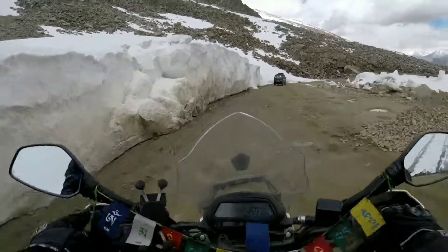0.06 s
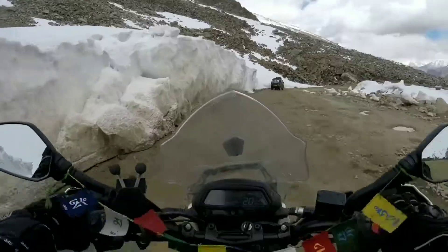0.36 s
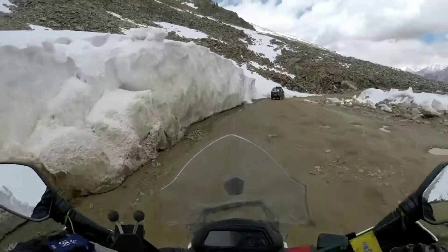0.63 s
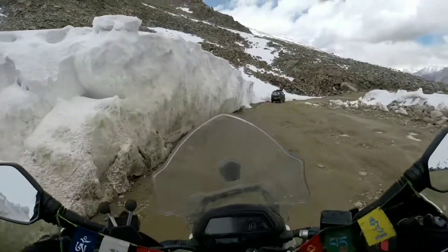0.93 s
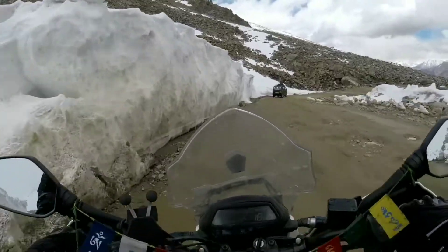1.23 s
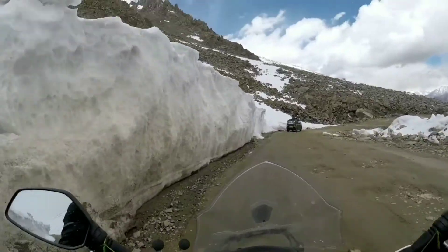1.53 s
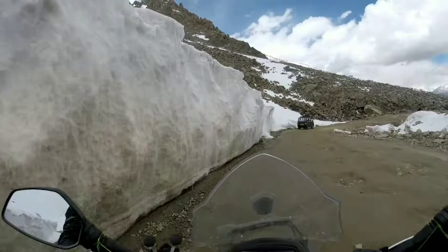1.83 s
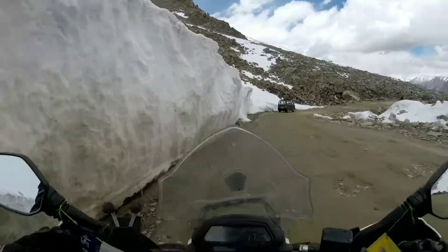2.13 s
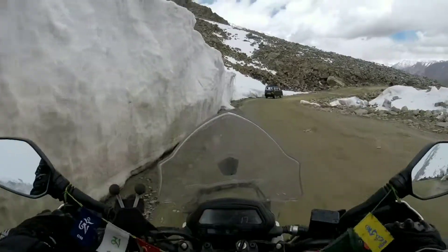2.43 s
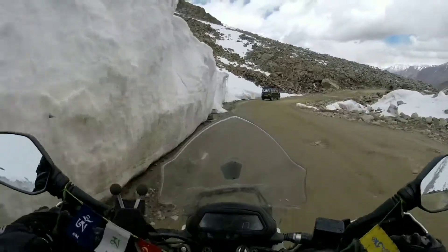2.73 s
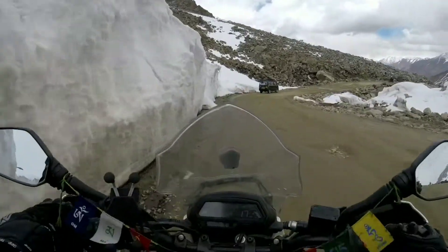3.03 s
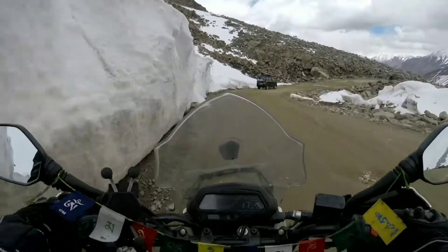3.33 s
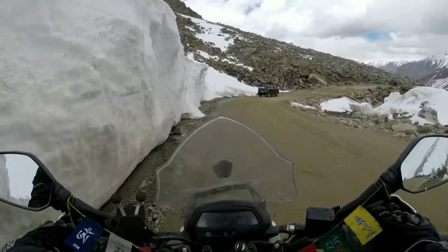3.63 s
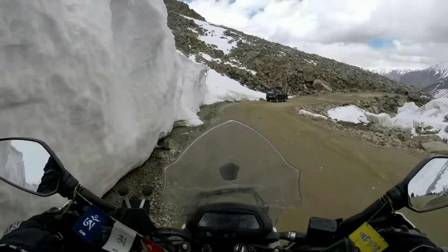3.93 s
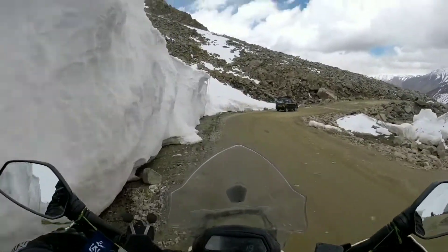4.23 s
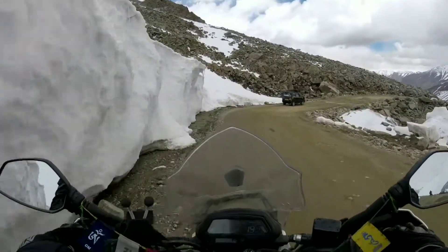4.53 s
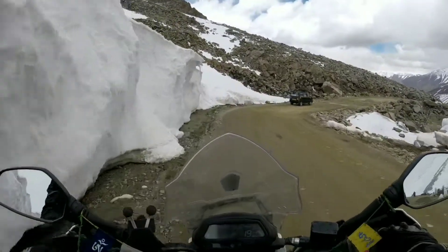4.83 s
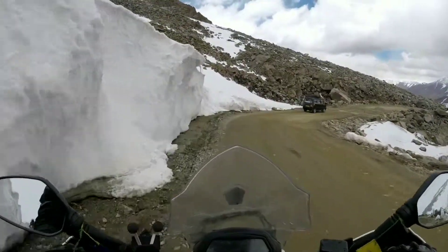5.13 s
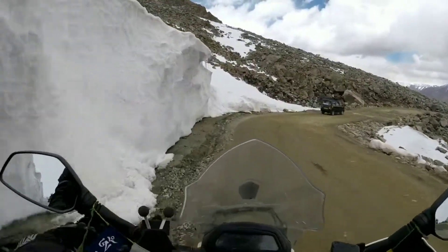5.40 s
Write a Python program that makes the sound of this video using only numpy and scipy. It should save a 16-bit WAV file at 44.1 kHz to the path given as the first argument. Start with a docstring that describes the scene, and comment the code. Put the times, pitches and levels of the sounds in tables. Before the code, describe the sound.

Heard from the seat, a motorcycle engine rumbles at low revs and briefly pulls, while tyres crunch and gravel clicks sharply.

```python
"""A single-cylinder motorcycle engine, heard from the seat, rolling slowly on wet gravel.
Each firing swings the gas in intake and exhaust: a thump at fast idle, a one-second pull with
gear whine, then a drop as the throttle shuts. Valve gear rings the cases; a body panel drones.
Tyres crunch through rough patches, stones tick against the bike, air buffets the microphone."""
import sys
import numpy as np
from scipy import signal
from scipy.fft import rfft, irfft, next_fast_len
from scipy.io import wavfile
from scipy.ndimage import uniform_filter1d, minimum_filter1d

SR = 44100
rng = np.random.default_rng(int(sys.argv[2]) if len(sys.argv) > 2 else 0)


def put_to_file(sound):
    """Save the sound as 16-bit audio at rate SR, in the file named by the first command-line argument."""
    columns = np.atleast_2d(sound).T  # one column per channel
    safe = np.clip(columns, -1, 1)
    whole_steps = np.round(safe * 32767)
    wavfile.write(sys.argv[1], SR, whole_steps.astype(np.int16))


N = 245195
TIME_S = np.arange(N) / SR

# Engine speed. Each row: time in seconds, firing rate in Hz.
FIRING_RATE = [(0.0, 19.69), (0.4, 19.74), (0.57, 18.81), (0.74, 20.02), (1.09, 18.24), (1.75, 19.41),
               (1.98, 18.94), (2.3, 18.96), (2.5, 19.88), (2.66, 21.37), (3.12, 23.62), (3.64, 25.0),
               (3.77, 23.9), (4.01, 20.84), (4.29, 18.63), (5.07, 19.71), (5.4, 17.42), (5.56, 18.35)]
# Exhaust bark. Each row: time in seconds, level in dB.
EXHAUST_LEVEL = [(0, -5), (2.2, -4.5), (3.4, -9.5), (4.5, -10), (5.3, -4.4)]
# Pipe response to higher firing orders. Each row: frequency in Hz, relative level in dB.
PIPE_RESPONSE = [(140, 6), (170, 1.5), (205, -7.5), (250, 0.5), (280, 0.5), (315, -22), (370, -7),
                 (420, -12.5), (560, -18)]
# Engine case resonances. Each row: frequency in Hz, relative level in dB, T60 in seconds.
CASE_MODES = [(187, -2.5, 0.038), (248, 0, 0.11), (275, -5.5, 0.074), (352.7, -8.5, 0.23),
              (374, -1.5, 0.11), (542.4, -7, 0.077), (1190, -27, 0.011), (1506, -9, 0.034),
              (2183, -13, 0.02)]
# Rough road. Each row: centre in seconds, half length in seconds, crunch in dB, jolt in dB.
ROUGH_PATCHES = [(0.405, 0.053, -22.5, -8), (0.656, 0.054, -25.5, -10), (0.928, 0.11, -26.5, -12.5),
                 (1.19, 0.051, -29, -19.5), (1.566, 0.021, -25, -19.5), (1.928, 0.041, -23, -15),
                 (3.576, 0.13, -42, -15), (4.286, 0.067, -46, -16), (4.57, .07, -37, -14),
                 (5.11, 0.052, -44, -16.5)]
# Stone hits. Each row: time in seconds, level in dB, stone's ring in Hz, ring re fitting in dB.
STONE_HITS = [(0.062, -5.5, 5320, -2), (0.3212, -6.5, 5660, 15), (0.389, -21, 5600, 2),
              (0.4232, -15, 5160, 25), (.618, -16.5, 5970, 8), (.7598, -8.5, 5400, 1),
              (0.786, -10, 10640, -9), (1.0097, -9, 5440, -6), (1.1136, -11.5, 8300, -10),
              (1.5187, -12.5, 9700, -3), (1.529, -9, 5300, -2), (1.5387, -10.5, 8600, -3),
              (1.703, -7, 5300, -8), (1.7244, -21.5, 10700, 9), (1.8105, -5, 8070, 0),
              (1.8242, -11, 5480, 3), (1.8525, -9.5, 7700, 5), (1.9318, -12, 5700, -2),
              (1.9476, -13.5, 7900, 13), (2.0414, -13.5, 7700, 0), (2.056, -7, 5600, 3),
              (2.074, -17, 5770, -11), (2.3173, -9.5, 5700, 0), (2.3313, -23, 8140, 6),
              (2.5, -12.5, 5670, 8), (2.909, -9, 5700, -3), (3.666, -16, 6100, -2.5),
              (4.531, -19.5, 5300, 1)]
# Resonances of a struck fitting. Each row: frequency in Hz, relative gain in dB, T60 in seconds.
FITTING_MODES = [(3090, 6, 0.015), (3786, 11.5, 0.0037), (5530, 3.5, 0.029), (6200, -6, 0.0036),
                 (8050, -2.5, 0.063), (9640, -19, 0.086), (15100, 13, 0.0064)]
# Front-end knocks. Each row: start in seconds, level in dB.
BUMPS = [(.355, -17), (0.386, -17), (.423, -13.5), (0.621, -22), (.655, -15), (.866, -20), (0.943, -13.5),
         (3.609, -17), (4.559, -13)]
# Faint squeaks. Each row: centre in seconds, peak in dB, pitch in Hz.
RUB_SQUEAKS = [(5.145, -30, 2320), (5.39, -32, 2200)]
# Noise spectra of tyres, hiss, knocks and wind. Each row: frequency in Hz, relative level in dB.
TYRE_SPECTRUM = [(120, 13), (250, 6.5), (420, 9.5), (560, 4.5), (750, 2), (1150, 3.5), (1600, -2),
                 (1900, -3), (2400, -9.5), (3400, -11), (4300, -19.5), (7000, -10.5), (12000, -91)]
HISS_SPECTRUM = [(1500, -8), (2300, -3), (3400, -6), (4400, -15), (4900, -7), (5500, 2), (6400, -4),
                 (7400, -4), (8800, -10), (10300, -11), (11300, -26.5), (13500, -25), (15500, -33)]
KNOCK_SPECTRUM = [(200, 16.5), (400, 18.5), (700, -3), (1200, 15), (1700, -2), (2500, 0), (3500, -9.5),
                  (5000, -40), (9000, -45)]
WIND_SPECTRUM = [(12, -12), (25, -4), (45, 0), (75, -5), (130, -11), (200, -18), (400, -36), (4000, -100)]


def thump(cycle):
    """Each firing: intake gulp, exhaust bark, silencer boom; airbox honk and slow puff grow with revs."""
    intake_db = rev_level_db(-3.5, db_per_hz=-0.28) - 10 * throttle_shut()
    honk_db = intake_db + rev_level_db(-25, db_per_hz=3)
    boom_db = rev_level_db(-13.5, db_per_hz=0.5)
    intake = from_db(intake_db) * gas_surge(cycle, angle=0.047, width=0.107, swings=5.635)
    exhaust = from_db(curve(EXHAUST_LEVEL)) * gas_surge(cycle, angle=0.246, width=0.189, swings=4.6)
    boom = from_db(boom_db) * gas_surge(cycle, 0.25, width=0.34, swings=1.85, uneven_db=0.8, jitter=0.011)
    honk = from_db(honk_db) * gas_surge(cycle, angle=-0.145, width=0.1, swings=5.6, uneven_db=0.8)
    puff = from_db(rev_level_db(-20, db_per_hz=2)) * np.cos(2 * np.pi * (cycle - 0.36))
    return intake + exhaust + boom + honk + puff


def gas_surge(cycle, angle, width, swings, uneven_db=1.0, jitter=0.006):
    """The gas column swings in one uneven burst per firing. Angle, width, jitter in cycles."""
    strength, early = rng.standard_normal((int(cycle[-1]) + 8, 2)).T
    out = 0
    for neighbour in (-1, 0, 1):
        firing = np.round(cycle - angle).astype(int) + neighbour
        offset = cycle - angle - firing + jitter * early[firing]
        envelope = from_db(uneven_db * strength[firing]) * np.exp(-0.5 * (offset / width) ** 2)
        out += envelope * np.sin(2 * np.pi * swings * offset)
    return out


def pipe_overtones(cycle, waver_db=6.0):
    """Each firing's sharp edge adds higher orders, shaped by the pipe, louder with revs."""
    rate_hz, out = curve(FIRING_RATE), 0
    hz, db = np.transpose(PIPE_RESPONSE)
    for order in range(7, 25):
        gain = from_db(np.interp(order * rate_hz, hz, db) + waver_db * drift(4.3))
        out += gain * np.sin(2 * np.pi * (order * cycle + rng.random()) + 0.5 * drift(2.46))
    return from_db(rev_level_db(-27.5, db_per_hz=1.0)) * unit_rms(out)


def case_clatter(cycle, jolt, per_cycle=9):
    """Piston, valves and cam chain ring the cases at set crank angles; louder on jolts."""
    angles = (np.arange(per_cycle) + rng.random(per_cycle)) / per_cycle
    hits = (np.arange(-1, int(cycle[-1]) + 1)[:, None] + angles).ravel()
    at = np.searchsorted(cycle, hits[(hits > cycle[0]) & (hits < cycle[-1])])
    out = 0
    for hz, level_db, t60_s in CASE_MODES:
        signs = np.resize(rng.choice([-1, 1], per_cycle), len(at))
        clicks = np.zeros(N)
        clicks[at] = signs + 0.7 * rng.standard_normal(len(at))
        out += from_db(level_db) * unit_rms(ring(clicks, hz, t60_s))
    steady = from_db(rev_level_db(-26.5, db_per_hz=-0.51, db_per_s=-0.14))
    return np.hypot(steady, from_db(-14) * jolt) * unit_rms(out)


def panel_drone(cycle, jolt, hz=274.4, t60_s=0.14):
    """A body panel drones when a firing order sweeps through its note, and when jolted."""
    firings = np.diff(np.floor(cycle), prepend=np.floor(cycle[0]))
    firings *= 1 + 0.4 * rng.standard_normal(N)
    level_db = rev_level_db(-37.5, db_per_hz=1.17) + 7.5 * throttle_shut(linger_s=0.51)
    driven = from_db(level_db) * unit_rms(ring(firings, hz, t60_s))
    jolted = from_db(-17.5) * jolt * unit_rms(ring(rng.standard_normal(N), hz, t60_s))
    return driven + jolted


def gear_whine(cycle):
    """The gearbox sings at high revs, with two overtones; the drive chain whirs throughout."""
    phase, flutter = tooth_mesh(cycle, order=60, twist_rad=1.2, rough_rad=2.2)
    tone = np.sin(phase) + from_db(-11.5) * np.sin(2 * phase) + from_db(-10.5) * np.sin(4 * phase)
    gearbox = flutter * tone * housing_gain(60, base_db=-46, boost_db=17, centre_hz=1450, width_hz=190)
    phase, flutter = tooth_mesh(cycle, order=80, twist_rad=1.8, rough_rad=3.6)
    chain_gain = housing_gain(80, base_db=-37.5, boost_db=4, centre_hz=1670, width_hz=90)
    return gearbox + chain_gain * flutter * np.sin(phase)


def tooth_mesh(cycle, order, twist_rad, rough_rad):
    """Phase and flutter of meshing teeth; each firing twists the shafts and smears the tone."""
    phase = 2 * np.pi * order * cycle + twist_rad * np.sin(2 * np.pi * cycle) + rough_rad * drift(11.2)
    return phase, unit_rms(1 + 0.5 * drift(110))


def housing_gain(order, base_db, boost_db, centre_hz, width_hz):
    """A mesh tone swells as it crosses a housing resonance."""
    detune = (order * curve(FIRING_RATE) - centre_hz) / width_hz
    return from_db(base_db + boost_db * np.exp(-detune ** 2))


def hiss(cycle, patch_gain, spray_db=-12):
    """Valve gear and wet grit sizzle, pulsing with each crank turn; rough patches throw spray."""
    sizzle = 0.99 * grains(per_s=900, spread_db=1.0) + rng.standard_normal(N)
    pulse_db = np.sin(4 * np.pi * cycle)
    steady = from_db(rev_level_db(-38, db_per_hz=0.52, db_per_s=-0.35) + pulse_db)
    return np.hypot(steady, from_db(spray_db) * patch_gain) * coloured(sizzle, HISS_SPECTRUM)


def tyres(patch_gain, flicker_db=2.0):
    """Tread crushes grit over a rolling rush; louder on rough patches."""
    crunch = grains(per_s=1300, spread_db=3.0) + 0.79 * rng.standard_normal(N)
    rolling = from_db(rev_level_db(-27.5, db_per_hz=0.36, db_per_s=-0.18))
    flicker = from_db(flicker_db * drift(32))
    return np.hypot(rolling, patch_gain) * flicker * coloured(crunch, TYRE_SPECTRUM)


def rough_patches():
    """Crunch and jolt gains swell and fade as the wheels cross each patch."""
    crunch = jolt = 0
    for centre_s, half_s, crunch_db, jolt_db in ROUGH_PATCHES:
        swell = np.exp(-np.minimum(((TIME_S - centre_s) / half_s) ** 2, 20))
        crunch += from_db(crunch_db) * swell
        jolt += from_db(jolt_db) * swell
    return crunch, jolt


def stone_ticks(lead_in_s=0.0045, lead_in_db=-17, attack_s=0.00018, contact_s=0.0034):
    """Stones strike a fitting and both ring. A faint, brief hiss leads into each dry crack."""
    out, t = np.zeros(N + SR), TIME_S[:SR // 25]
    crack_band = signal.butter(2, [2400, 9800], "band", fs=SR, output="sos")
    since_s = np.maximum(t - lead_in_s, 0)
    rise = from_db(lead_in_db) + 1 - np.exp(-since_s / attack_s)
    envelope = rise * np.exp(-(since_s / contact_s) ** 2)
    for hit_s, level_db, stone_hz, stone_db in STONE_HITS + loose_grit():
        burst = rng.standard_normal(len(t)) * envelope
        fitting = 0
        for hz, db, t60_s in FITTING_MODES:
            gain = from_db(db + 2 * rng.standard_normal())
            fitting += gain * ring(burst, hz * (1 + 0.028 * rng.standard_normal()), t60_s)
        stone = from_db(stone_db) * unit_rms(ring(burst, stone_hz, t60_s=0.016))
        crack = from_db(0.5) * unit_rms(signal.sosfilt(crack_band, burst))
        tick = unit_rms(fitting) + stone + crack
        start = round((hit_s - lead_in_s) * SR)
        out[start:start + len(t)] += from_db(level_db) * tick / np.abs(tick).max()
    return signal.sosfilt(signal.butter(4, 10800, fs=SR, output="sos"), out[:N])


def loose_grit(count=11, from_s=0.27, to_s=1.05, level_db=-17.5, low_hz=5050, high_hz=6980, ring_db=8.5):
    """Small stones fly at random off loose road; rows as in STONE_HITS."""
    return [(from_s + when * (to_s - from_s), level_db, low_hz + pitch * (high_hz - low_hz), ring_db)
            for when, pitch in rng.random((count, 2))]


def front_knocks(decay_s=0.0093):
    """The front end knocks dully over larger bumps."""
    envelope = np.zeros(N)
    for start_s, level_db in BUMPS:
        start = round(start_s * SR)
        envelope[start:] += from_db(level_db) * np.exp(-TIME_S[:N - start] / decay_s)
    return np.std(envelope) * coloured(envelope * rng.standard_normal(N), KNOCK_SPECTRUM)


def squeaks(half_s=0.011):
    """A rubbing part chirps, sagging slightly in pitch."""
    out = 0
    for centre_s, peak_db, hz in RUB_SQUEAKS:
        t = TIME_S - centre_s
        phase = 2 * np.pi * hz * (t - 0.35 * t * t) + drift(60)
        out += from_db(peak_db) * np.exp(-(t / half_s) ** 2) * np.sin(phase)
    return out


def wind(jolt, level_db=-17.5, lurch_db=3.5):
    """Air buffets the microphone, more on jolts and as the bike lurches off the throttle."""
    steady = from_db(level_db + lurch_db * throttle_shut())
    return np.hypot(steady, jolt) * coloured(rng.standard_normal(N), WIND_SPECTRUM)


def rev_level_db(idle_db, db_per_hz, db_per_s=0, idle_hz=19):
    """Level that follows the firing rate above idle, with an optional fade."""
    return idle_db + db_per_hz * (curve(FIRING_RATE) - idle_hz) + db_per_s * TIME_S


def throttle_shut(linger_s=0, shut_s=3.67, reopen_s=4.17, twist_s=0.05):
    """1 while the throttle is shut and for linger_s after, else 0."""
    return (np.tanh((TIME_S - shut_s) / twist_s) - np.tanh((TIME_S - reopen_s - linger_s) / twist_s)) / 2


def from_db(db):
    """Decibels to gain."""
    return 10 ** (np.asarray(db) / 20)


def unit_rms(x):
    """Scale to RMS 1."""
    return x / np.sqrt(np.mean(x ** 2) + 1e-20)


def curve(rows):
    """Time-value rows interpolated to every sample."""
    return np.interp(TIME_S, *np.transpose(rows))


def drift(rate_hz, hop=40):
    """Smooth random wander, RMS about 1."""
    pole = np.exp(-2 * np.pi * hop * rate_hz / SR)
    noise = rng.standard_normal(N // hop + 2002)
    slow = signal.lfilter([1], [1, -2 * pole, pole * pole], noise)[2000:]
    return np.interp(np.arange(N) / hop, np.arange(len(slow)), unit_rms(slow))


def coloured(x, spectrum):
    """Filter by a spectrum table; RMS 1."""
    hz, db = np.transpose(spectrum)
    size = next_fast_len(N)
    bins_hz = np.maximum(np.fft.rfftfreq(size, 1 / SR), 1)
    gain = from_db(np.interp(np.log(bins_hz), np.log(hz), db))
    return unit_rms(irfft(rfft(x, size) * gain, size)[:N])


def ring(drive, hz, t60_s):
    """Resonator: a unit click starts a decaying unit sine."""
    radius, step_rad = from_db(-60 / (t60_s * SR)), 2 * np.pi * hz / SR
    feedback = [1, -2 * radius * np.cos(step_rad), radius * radius]
    return signal.lfilter([0, np.sin(step_rad)], feedback, drive + 1e-18)


def grains(per_s, spread_db):
    """Random clicks of uneven size; RMS 1."""
    sizes = from_db(spread_db * np.minimum(rng.exponential(1, N), 4)) * rng.choice([-1, 1], N)
    return unit_rms(sizes * (rng.random(N) < per_s / SR))


def scene():
    """Engine layers follow the crank; road and wind add their noise. Mono."""
    cycle = np.cumsum(curve(FIRING_RATE)) / SR - 0.51  # one per firing, two crank turns
    patch_gain, jolt = rough_patches()
    firing = thump(cycle) + pipe_overtones(cycle)
    machinery = case_clatter(cycle, jolt) + panel_drone(cycle, jolt) + gear_whine(cycle)
    sizzle = hiss(cycle, patch_gain)
    road = stone_ticks() + tyres(patch_gain) + front_knocks() + squeaks()
    return (firing + machinery + sizzle + road + wind(jolt))[None]


def record(dry, ceiling=0.95, stopband_hz=16200):
    """Fast peak limiter, then a steep low-pass."""
    needed = np.minimum(1, ceiling / (np.abs(dry) + 1e-9))
    gain = uniform_filter1d(minimum_filter1d(needed, size=65), size=65)
    return signal.sosfilt(signal.cheby2(14, 60, stopband_hz, fs=SR, output="sos"), dry * gain)


dry = scene()
out = record(dry)
put_to_file(out)
```